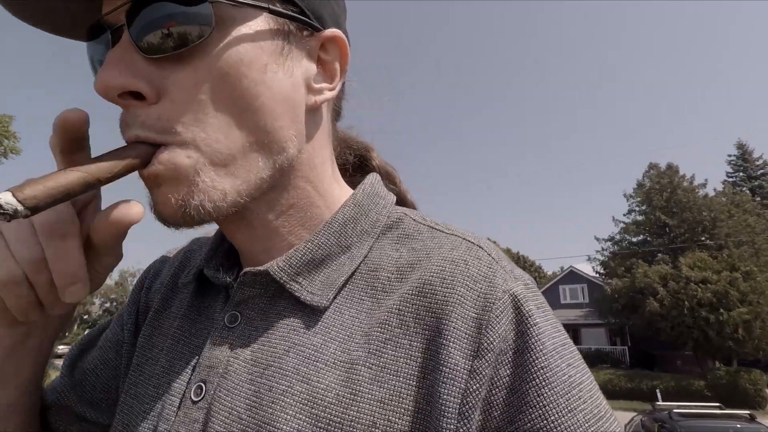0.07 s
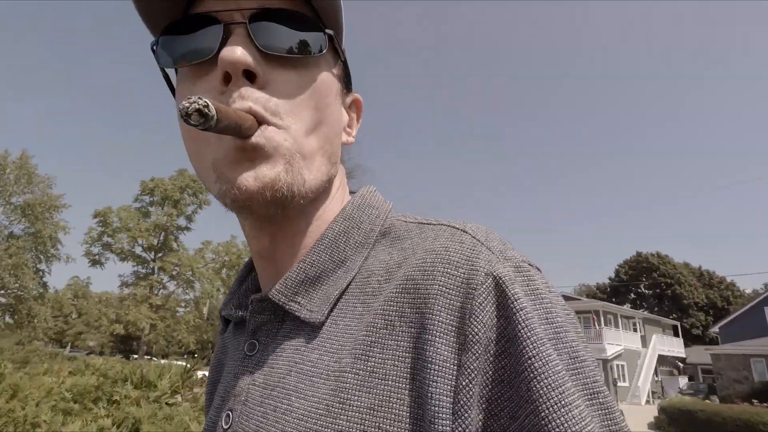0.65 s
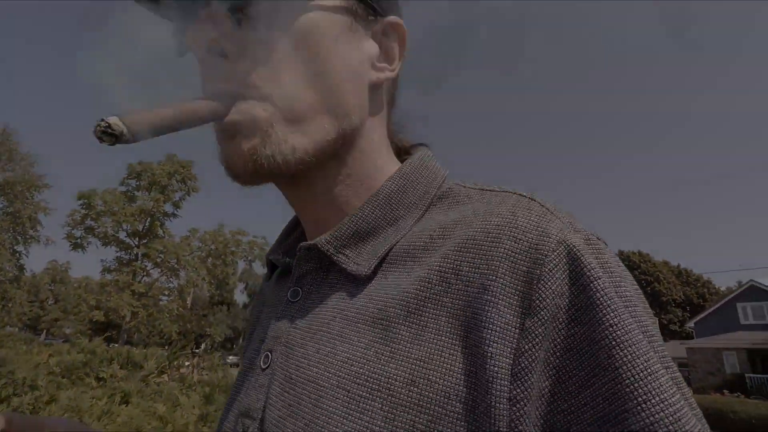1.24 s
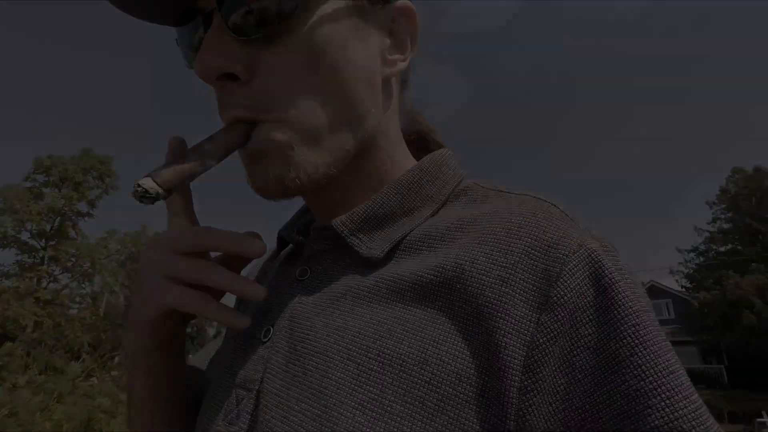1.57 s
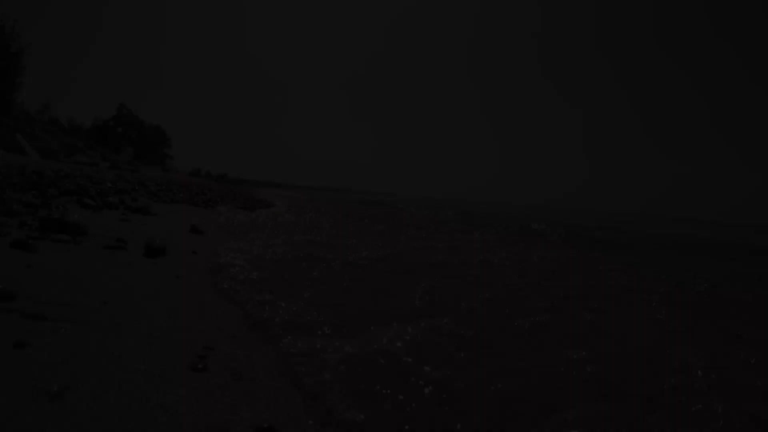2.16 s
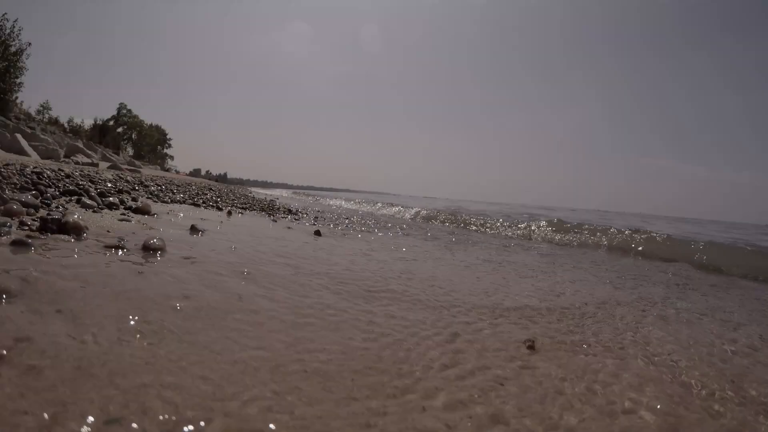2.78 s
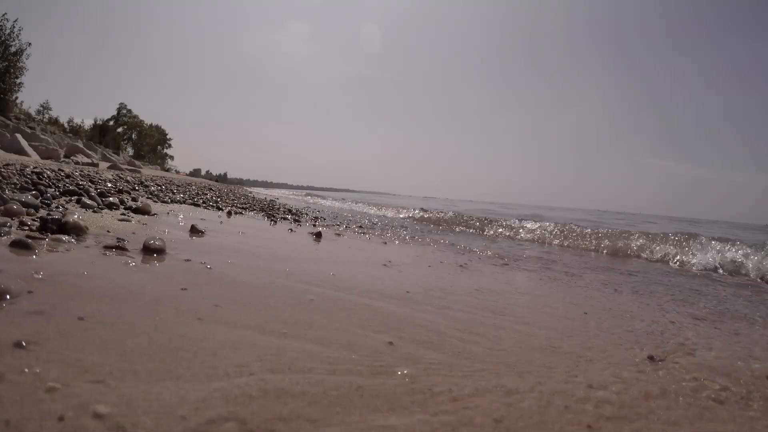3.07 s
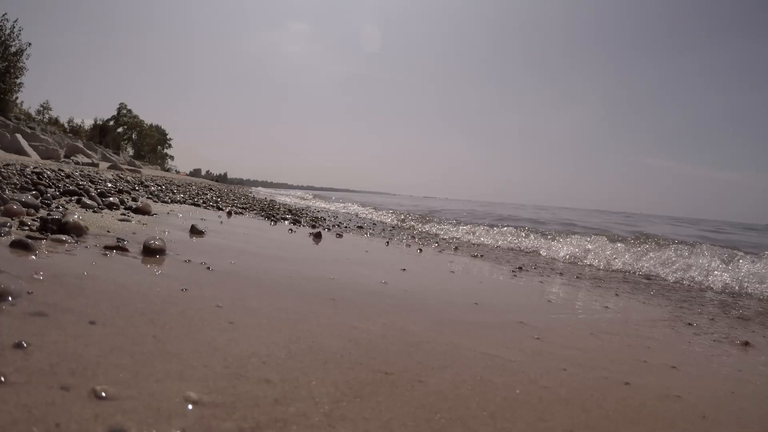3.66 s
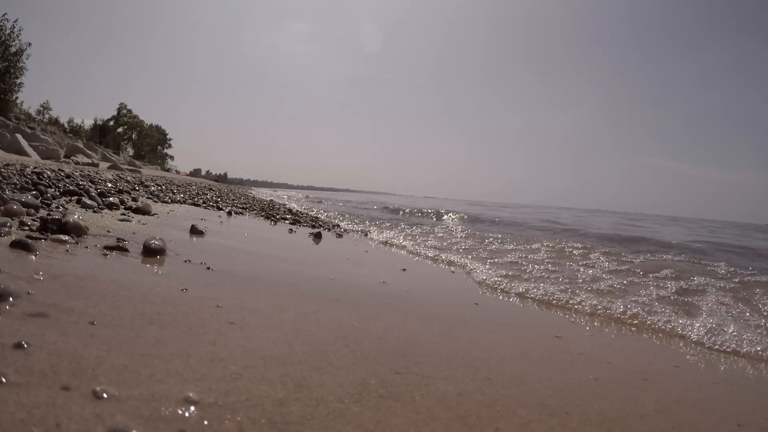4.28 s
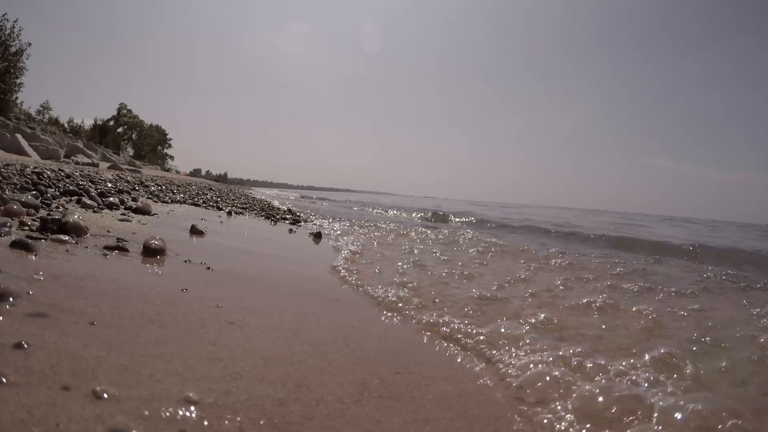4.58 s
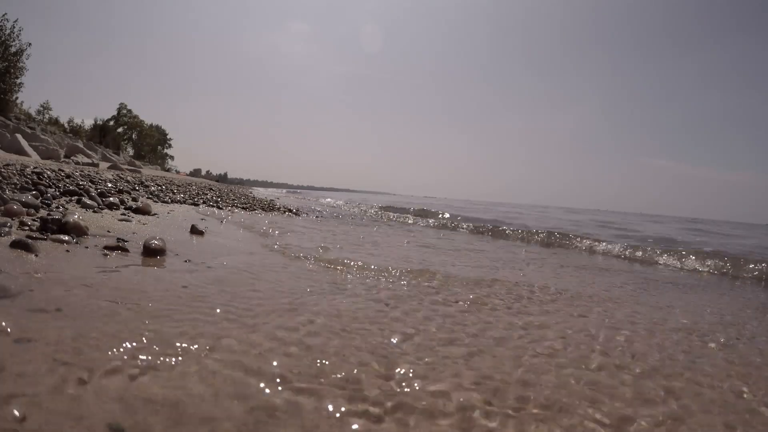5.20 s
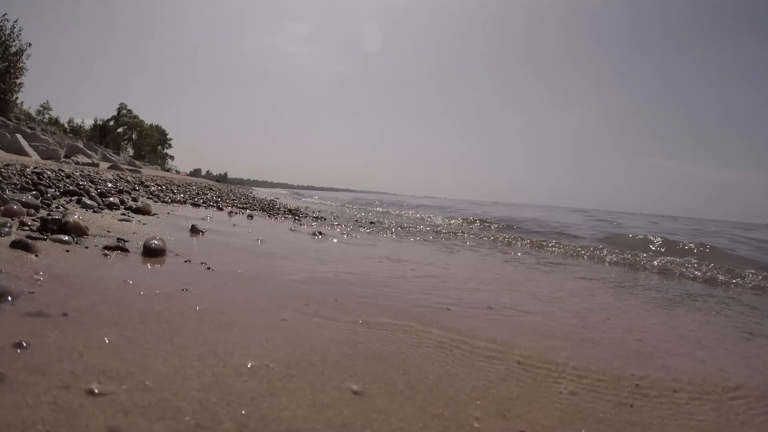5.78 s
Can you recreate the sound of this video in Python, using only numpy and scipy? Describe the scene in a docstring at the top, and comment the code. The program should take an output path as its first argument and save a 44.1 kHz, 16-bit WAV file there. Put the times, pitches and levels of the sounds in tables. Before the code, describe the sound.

Small waves wash onto a sand and pebble shore close by, over a low wavering hum and early wind buffeting the microphone.

```python
"""Small lake waves lap close by, then break and run up a sand and pebble shore.
Each wave is a cloud of ringing bubbles: big ones gurgle, middling ones make a soft wash, tiny ones
fizz as foam and spray. Single bubbles plop, and drops tick and crack on the wet sand.
A low hum wavers underneath, and a breeze buffets the microphone, most of all in the first big wave."""
import sys
import numpy as np
from scipy import signal
from scipy.fft import rfft, irfft, next_fast_len
from scipy.io import wavfile
from scipy.ndimage import uniform_filter1d

SR = 44100
rng = np.random.default_rng(int(sys.argv[2]) if len(sys.argv) > 2 else 0)


def pcm_store(signal):
    """Save signal as 16-bit PCM."""
    levels = np.round(np.clip(np.atleast_2d(signal), -1, 1) * 32767)
    wavfile.write(sys.argv[1], SR, levels.astype(np.int16).T)


N = 257544
TIME = np.arange(N) / SR
FFT_SIZE = next_fast_len(N + 4096)
BIN_HZ = np.maximum(np.arange(FFT_SIZE // 2 + 1) * SR / FFT_SIZE, 1)


def from_db(db):
    """Turn decibels into a number to multiply by."""
    return 10 ** (np.asarray(db) / 20)


def unit_power(x):
    """Scale a sound so that its average power is 1."""
    return x / np.sqrt(np.mean(x ** 2) + 1e-20)


def in_time(rows):
    """Join a table's points into one curve over time for each column."""
    times_s, *columns = np.transpose(rows)
    return [np.interp(TIME, times_s, column) for column in columns]


def in_frequency(rows):
    """Join a table's points into one curve from bass to treble for each column."""
    hz, *columns = np.transpose(rows)
    return [np.interp(np.log(BIN_HZ), np.log(hz), column) for column in columns]


def panned(pan_db):
    """Left and right gains: the left is louder by pan_db."""
    return from_db(np.array([[.5], [-.5]]) * pan_db)


def add(out, start_s, sound):
    """Mix a short sound in at start_s."""
    at = int(start_s * SR)
    out[:, at:at + sound.shape[-1]] += sound[..., :N - at]


def drift(rate_hz):
    """A smooth random wobble, about 1 in size."""
    decay = np.exp(-80 * np.pi * rate_hz / SR)
    noise = rng.standard_normal(N // 40 + 2002)
    slow = signal.lfilter([1], [1, -2 * decay, decay * decay], noise)[2000:]
    return np.interp(np.arange(N) / 40, np.arange(len(slow)), unit_power(slow))


def swells(crest_s, rise_s, fall_s, level_db, floor_db, swing=1):
    """Swells build to a rounded crest, then sink. Gives each one's power and the total in dB."""
    t = TIME - crest_s[:, None]
    # the level moves 10 * swing dB in rise_s or fall_s; minus signs on these make no difference
    shape_db = -10 * np.where(t < 0, (t / rise_s[:, None]) ** 2, t / np.abs(fall_s[:, None]))
    power = from_db(np.maximum(level_db[:, None] + swing * shape_db, -150)) ** 2
    return power, 10 * np.log10(power.sum(axis=0) + from_db(floor_db) ** 2)


def tilted(x, tilt_db, low_hz, high_hz):
    """Raise the treble and lower the bass by a moving amount."""
    spectrum = rfft(x, FFT_SIZE)
    bass = irfft(spectrum / (1 + (BIN_HZ / low_hz) ** 10), FFT_SIZE)[:, :N]
    treble = irfft(spectrum / (1 + (high_hz / BIN_HZ) ** 10), FFT_SIZE)[:, :N]
    return x + (from_db(-tilt_db) - 1) * bass + (from_db(tilt_db) - 1) * treble


def ring(clicks, hz, fade_s):
    """Each click starts a tone. Here and below, fade_s is the time to die away by 60 dB."""
    decay = from_db(-60 / (fade_s * SR))
    step = 2 * np.pi * hz / SR
    return signal.lfilter([0, np.sin(step)], [1, -2 * decay * np.cos(step), decay ** 2], clicks + 1e-18)


def bubble(hz, fade_s, rise, lead_rad):
    """One bubble swells, then dies away as its pitch rises. The left side is ahead by lead_rad."""
    t = TIME[:SR // 10]
    phase = 2 * np.pi * hz * t * (1 + rise * t / fade_s)
    envelope = (1 - np.exp(-2 * hz * t)) * np.exp(-np.log(1000) * t / fade_s)
    return envelope * np.sin(phase + np.array([[lead_rad], [0]]))


def bubble_cloud(low_hz, high_hz, per_s, cycles, size_db, clump_db, blur_db, pitches=24):
    """Two swarms of bubbles, born in clumps and ringing briefly; the far ones blur into noise."""
    out, together = np.zeros((2, N)), drift(28)
    for hz in np.geomspace(low_hz, high_hz, pitches):
        when, size, sign, side, chance = rng.random((5, 6000))
        at = (when * N).astype(int)
        clump = from_db(clump_db * np.minimum((together + drift(20))[at] / np.sqrt(2), 1))
        height = from_db(size_db * np.minimum(-np.log(1 - size), 4.5)) * np.sign(sign - .5) * clump
        born = chance < per_s * N / SR / pitches / len(at)
        clicks = np.zeros((2, N))
        clicks[(2 * side).astype(int), at] = height * born
        out += np.sqrt(hz) * unit_power(ring(clicks, hz, cycles / hz))   # even power per Hz
    return unit_power(out) + from_db(blur_db) * rng.standard_normal((2, N))


# Where the water is: time_s, pan_db, aside (0 straight ahead, 1 off to the side)
WATER_PLACE = [(0.0, -4, 0), (0.37, 5, 0.47), (1.28, -0.5, 0.0071), (1.8, 0.5, 0.29), (2.34, 2.5, 0.974),
               (3.6, 2.5, 0.77), (4.35, 4, 1), (5.11, 2.5, 0.63), (5.27, -2, 0), (5.84, -3, 0.35)]
# How the microphone's two openings compare: pitch_hz, alike (0-1), pan_db, lead_ahead_rad, lead_aside_rad
MIC_OPENINGS = [(130, 0.95, 4.9, -0.2, -0.2), (260, 0.65, 0.0, -0.3, -0.3), (440, 0.85, 0.2, -0.8, -0.2),
                (690, 0.4, -5.0, -1.9, 1.4), (860, 0.78, -1.8, -3.6, 1.9), (1150, 0.92, 1.5, -4.1, 1.9),
                (1270, 0.9, 4.7, -4.2, 1.8), (1500, 0.86, 1.7, -4.6, 1.15), (2400, 0.78, 1.2, -4.35, 1.1),
                (3600, 0.62, 3.0, -5.0, 0.45), (4650, 0.35, -3.6, -6.8, -0.2),
                (5200, 0.66, -0.9, -8.4, -1.3), (7500, 0.7, -1.2, -9.0, -2.4),
                (11000, 0.3, -2.8, -10.5, -4.2)]


def at_microphone(pair, tone_colour):
    """Sound reaches two openings partly alike; how far the left leads depends on where the water is."""
    alike, pan_db, lead_ahead, lead_aside = in_frequency(MIC_OPENINGS)
    _, aside = in_time(WATER_PLACE)
    shared, opposed = rfft(pair, FFT_SIZE) * from_db(in_frequency(tone_colour)[0])
    both_sides = np.sqrt(1 + alike) * shared + np.sqrt(1 - alike) * opposed * [[1], [-1]]
    left, right = both_sides * panned(pan_db)
    spectra = [left * np.exp(1j * lead_ahead), left * np.exp(1j * lead_aside), right]
    left_ahead, left_aside, right = irfft(spectra, FFT_SIZE)[:, :N]
    left = (1 - aside) * left_ahead + aside * left_aside
    return np.array([left, right]) / np.std((left_ahead + right) / 2)


# Tone colours of the wash and of the gurgle: pitch_hz, gain_db
WASH_COLOUR = [(100, -72), (450, -25), (750, -11.5), (1000, -1.5), (1170, -1), (1265, 1.5), (1380, -1.5),
               (1540, -2), (1720, -5), (2100, -10), (2600, -15.5), (3300, -23), (4400, -29.5),
               (6000, -68.5)]
GURGLE_COLOUR = [(90, -50.5), (170, 13.5), (250, -7), (350, -3.5), (520, -1), (720, 0.5), (950, 4),
                 (1400, -51.5)]
# Waves and little slaps of water:
# crest_s, rise_s, fall_s, wash_db, gurgle_db, fizz_db, fizz_treble_db, gurgle_bass_db
LAKE_WAVES = [(.03, 0.5, 0.23, -53, -49.5, -62, -3, -1), (.38, 0.26, 2, -52, -55, -68.5, -4.5, -2),
              (.78, 0.23, 1.5, -40.5, -48, -58, 6, -1), (.97, .38, .48, -33, -39, -45.5, -1.5, 3),
              (1.26, 0.3528, 0.5, -28.5, -35, -42, 1.5, 4.5),
              (1.56, 0.2523, 0.16, -34.5, -43, -49, -1.5, 3), (1.82, -0.27, .12, -42, -39, -58, 2, 0),
              (2.35, 0.25, 0.1944, -41, -44.5, -57.5, 0, -1), (2.69, 0.24, 0.5, -41.5, -45, -59, 1, 1),
              (2.96, 0.37, 0.5, -39, -43.5, -54, -1.5, -0.5),
              (3.22, 0.2286, 0.4, -43.5, -47.5, -65.5, -13.5, 1.5),
              (3.7, 0.12, 2, -47.5, -48.5, -60, -4.5, 1.5), (3.861, 0.1, 0.3, -40, -47.5, -54.5, -4, 2.5),
              (4.258, 0.26, 0.26, -32, -37, -46, -4.5, 0), (4.51, 0.23, 0.12, -39.5, -47, -56.5, -6, -2),
              (4.78, 0.3, 0.13, -40.5, -51.5, -56.5, -1, -1),
              (4.98, 0.18, 0.85, -40.5, -50.5, -57, -1.5, 2.5),
              (5.025, .06, -0.03, -55, -40.5, -65, -0.5, 0.5), (5.36, 0.11, 0.3, -35.5, -50.5, -51, -3, 4),
              (5.57, .16, 0.24, -31.5, -35.5, -59, 10, 3), (5.619, 0.0232, 0.09, -29.5, -31, -46, 1, 0.5),
              (5.79, 0.06, .15, -43, -42.5, -65, 2.5, -3.5)]


def waves():
    """Middling bubbles make the wash, big ones gurgle, tiny ones fizz; all three swell with each wave."""
    crest_s, rise_s, fall_s, wash_tops, gurgle_tops, fizz_tops, treble_db, bass_db = np.transpose(
        LAKE_WAVES)
    _, wash_db = swells(crest_s, rise_s, fall_s, wash_tops, floor_db=-57)
    gurgle_power, gurgle_db = swells(crest_s, rise_s, fall_s, gurgle_tops, floor_db=-60.5)
    foam_crest_s = crest_s - 0.064 * rise_s   # spray flies just before the crest
    foam_power, foam_db = swells(foam_crest_s, rise_s, fall_s, fizz_tops, floor_db=-73, swing=1.137)
    wash = bubble_cloud(585, 5046, per_s=7000, cycles=27.45, size_db=2.5, clump_db=1.5, blur_db=4.5,
                        pitches=40)
    wash = at_microphone(wash, WASH_COLOUR)
    gurgle = bubble_cloud(230.5, 1105, per_s=1200, cycles=23.4, size_db=2.5, clump_db=2, blur_db=-14)
    depth_db = bass_db @ gurgle_power / gurgle_power.sum(axis=0)   # the loudest wave counts most
    gurgle = tilted(at_microphone(gurgle, GURGLE_COLOUR), -depth_db, low_hz=536, high_hz=656)
    water = from_db(wash_db) * wash + from_db(gurgle_db) * gurgle
    fizz = foam_and_spray(foam_power, foam_db, treble_db)
    pan_db, _ = in_time(WATER_PLACE)
    # the body of a wave is wider than its foam, so it leans less to one side
    return water * panned(0.71 * pan_db) + fizz * panned(pan_db)


# Tone colour of the fizz: pitch_hz, gain_db
FIZZ_COLOUR = [(150, -58), (1800, -12.5), (3200, 4), (4700, -4.5), (5800, -1.5), (7800, -1.5),
               (10000, -10.5), (11500, -20.5), (13500, -18), (15000, -34.5)]
# Sheets of spray thrown close by: crest_s, rise_s, fall_s, level_db, treble_db
SPRAY_SHEETS = [(.66, .13, 1.0, -52, 3), (5.298, 0.03, 0.26, -44.5, 3), (5.54, 0.04, 0.09, -44, 2.5)]


def foam_and_spray(foam_power, foam_db, foam_treble_db):
    """Tiny bubbles fizz in the foam, with spray on top; finer foam sounds brighter."""
    *spray_shape, spray_treble_db = np.transpose(SPRAY_SHEETS)
    spray_power, fizz_db = swells(*spray_shape, floor_db=foam_db)
    total_power = foam_power.sum(axis=0) + spray_power.sum(axis=0)
    treble_db = (foam_treble_db @ foam_power + spray_treble_db @ spray_power) / total_power
    fizz = bubble_cloud(2585, 13300, per_s=3500, cycles=32, size_db=2, clump_db=5.5, blur_db=4.5)
    fizz = tilted(at_microphone(fizz, FIZZ_COLOUR), treble_db, low_hz=4530, high_hz=10000)
    # lone ticks stand out in calm water and start to drown once the fizz passes -67 dB
    tick_db = 6.5 - 0.67 * np.maximum(fizz_db + 67, 0)
    return from_db(fizz_db) * (fizz + from_db(tick_db) * foam_ticks())


def foam_ticks(per_s=60, size_db=4, fade_s=0.00337):
    """Lone foam bubbles burst close by at random moments."""
    out = np.zeros((2, N))
    for when, size, pitch, side in rng.random((int(per_s * N / SR), 4)):
        height = from_db(size_db * min(-np.log(1 - size), 2))
        tick = bubble(3000 * 3 ** pitch, fade_s, rise=.04, lead_rad=-0.97)
        add(out, when * N / SR, height * tick * panned(10 * (side - .4)))
    return out


# Swells of the hum: crest_s, rise_s, fall_s, level_db
HUM_LEVELS = [(.72, 0.36, 8, -42), (.95, 0.05, 0.2, -32), (1.14, 0.1, .1, -24), (1.38, 0.31, 0.5646, -27.5),
              (3.336, 0.4, -0.03, -35), (3.63, 0.3, -0.5, -48), (4.1, 0.1, -0.1, -44.5),
              (4.35, 0.34, 3, -49), (5.41, 0.04, 0.1, -29), (5.52, 0.09, 0.24, -31)]
# The hum's note: time_s, pitch_hz, roughness (0-1)
HUM_NOTE = [(0, 140, 0.13), (1.2, 143, 0.82), (1.5, 137.5, 0.82), (1.7, 138, 0.21), (2.3, 143.9, 0.27),
            (3.2, 146.4, 0.12), (3.7, 156, 0.23), (5.15, 153, 0.22), (5.45, 160.1, 0.69),
            (5.84, 158.6, 0.33)]
# The hum throbs more while it is faint: time_s, depth_db
HUM_THROB = [(3.3, .7), (3.6, 2.8), (5.15, 2.8), (5.35, 1)]


def hum(shake_hz=29, above_hz=8, steady_s=0.0472, throb_hz=10):
    """A low tone wavers, now smooth, now a rough drone that spreads a little above its pitch."""
    _, level_db = swells(*np.transpose(HUM_LEVELS), floor_db=-60)
    pitch_hz, rough = in_time(HUM_NOTE)
    noise = rng.standard_normal((2, N))
    shake = unit_power(signal.sosfilt(signal.butter(3, shake_hz, fs=SR, output="sos"), noise))
    shake = (shake[0] + 1j * shake[1]) * np.exp(2j * np.pi * above_hz * TIME)
    drone = np.sqrt(1 - rough) + np.sqrt(rough / 2) * shake
    drone /= np.sqrt(uniform_filter1d(np.abs(drone) ** 2, int(steady_s * SR)))   # even out its strength
    tone = np.real(drone * np.exp(2j * np.pi * np.cumsum(pitch_hz) / SR))
    tone = signal.sosfilt(signal.butter(6, 109, "high", fs=SR, output="sos"), tone)
    throb = from_db(in_time(HUM_THROB)[0] * drift(throb_hz))
    pan_db = np.interp(TIME, [1.5, 5.0], [5.2, 1.8])
    return from_db(level_db) * unit_power(tone * throb) * panned(pan_db)


# Strength of the breeze's rumble: time_s, level_db
BREEZE_LEVEL = [(0.0, -54.5), (0.18, -59.5), (0.85, -36), (0.95, -40.5), (1.1, -25), (1.21, -37),
                (1.4, -31.5), (2.29, -41), (3.3, -65), (3.33, -54), (4.77, -69), (5.84, -75)]
# Tone colour of the rumble: pitch_hz, gain_db
RUMBLE_COLOUR = [(12, -27), (25, -9), (40, 5.5), (55, 4.5), (75, 9.5), (110, 10.5), (170, 3.5), (235, -3.5),
                 (330, -52)]
# Sudden gusts: start_s, level_db, pitch_hz, fade_s
GUSTS = [(.818, -10.5, 134, 0.25), (1.003, -10.5, 117.5, 0.21), (1.075, -18.5, 90, .14),
         (1.11, -19, 124.3, .1), (1.168, -13.5, 153, 0.12), (1.585, -31, 120, 0.105),
         (2.615, -26.5, 142.5, 0.52)]


def breeze(swell_s=0.011):
    """Air rumbles over the microphone, and each gust hits it with a soft thud."""
    rumble = at_microphone(rng.standard_normal((2, N)), RUMBLE_COLOUR)
    out = from_db(in_time(BREEZE_LEVEL)[0]) * rumble
    t = TIME[:SR // 2]
    for start_s, level_db, pitch_hz, fade_s in GUSTS:
        envelope = (1 - np.exp(-(t / swell_s) ** 2)) * np.exp(-np.log(1000) * t / fade_s)
        thud = envelope * np.sin(2 * np.pi * pitch_hz * t)
        add(out, start_s, from_db(level_db) * thud * panned(5.54))
    return out


# Big single bubbles: start_s, level_db, pitch_hz, fade_s
BIG_BUBBLES = [(.065, -37, 804, 0.027), (.18, -38.5, 780, .05), (.479, -21, 1104, 0.0144),
               (.683, -25, 1388, 0.022), (.705, -19.5, 1420, 0.015), (.763, -15.5, 1250, 0.0147),
               (.955, -15, 1420, .025), (.989, -16.5, 1279, 0.033), (1.228, -17, 1343, 0.033),
               (1.333, -15, 1380, .025), (2.311, -27, 785, .04), (2.413, -25.5, 1410, 0.0304),
               (2.533, -28.5, 1300, .03), (2.689, -22, 1285, 0.038), (2.764, -28.5, 442, 0.055),
               (2.767, -23.5, 1216, 0.024), (2.909, -24, 1600, 0.034), (2.973, -13.5, 1238, 0.016),
               (2.974, -18, 1720, 0.017), (3.164, -26.5, 1445, 0.053), (3.232, -29, 329, 0.087),
               (3.289, -28, 1410, 0.022), (3.854, -26, 600, 0.033), (3.896, -22, 1320, 0.049),
               (4.109, -17, 1410, 0.016), (4.157, -23.5, 490, 0.049), (4.505, -18.5, 1220, 0.018),
               (4.597, -23.5, 760, 0.021), (4.955, -31, 1290, 0.1), (4.969, -29, 1460, 0.0166),
               (5.021, -28, 674, 0.027), (5.027, -26.5, 780, 0.028), (5.09, -27, 1561, .03),
               (5.315, -26, 214.5, 0.19), (5.337, -20.5, 1296, 0.036), (5.348, -18, 1510, .03),
               (5.349, -27.5, 920, .03), (5.62, -13, 1080, 0.029), (5.658, -19.5, 1340, 0.034),
               (5.75, -19.5, 745, 0.041)]
# Drops and bursting foam close by: start_s, level_db, pitch_hz, fade_s, pan_db
CLOSE_DROPS = [(.524, -35.5, 3180, 0.016, 0), (.72, -30, 3860, 0.007, 4), (2.177, -40, 7950, 0.0048, -8),
               (2.467, -44, 9150, 0.005, -14), (2.511, -31.5, 6760, 0.0022, 13.5),
               (2.517, -34.5, 3346, .014, 7), (2.591, -37, 7190, 0.0053, 12), (2.685, -35, 3800, .012, 7),
               (2.806, -31, 3110, .016, 0), (3.242, -37, 3230, .014, 11), (3.302, -33, 5200, .0017, 13),
               (3.403, -35, 6900, 0.0033, 6.5), (3.451, -33.5, 4480, 0.012, 6),
               (3.493, -35, 8380, 0.0023, 5), (3.844, -35.5, 7440, 0.007, 4.5),
               (3.981, -30, 5850, 0.0058, 5.5), (5.051, -41, 6200, .006, 5), (5.214, -41, 4450, .012, -7),
               (5.259, -39, 4240, 0.0126, -2), (5.536, -29, 8250, .0038, -6.5)]


def plops_and_drops():
    """Single bubbles ring out: big ones plop in the waves, small ones tick on the wet sand."""
    out = np.zeros((2, N))
    for start_s, level_db, pitch_hz, fade_s in BIG_BUBBLES:
        plop = bubble(pitch_hz, fade_s, rise=0.021, lead_rad=1.455)
        add(out, start_s, from_db(level_db) * plop * panned(1.7))
    for start_s, level_db, pitch_hz, fade_s, pan_db in CLOSE_DROPS:
        tick = bubble(pitch_hz, fade_s, rise=0.088, lead_rad=-0.67)
        add(out, start_s, from_db(level_db) * tick * panned(pan_db))
    return signal.sosfilt(signal.butter(2, 130, "high", fs=SR, output="sos"), out)


# Flurries of droplets: start_s, length_s, top_level_db, drops_per_s
FLURRIES = [(2.504, 0.38, -35.5, 30), (3.653, 0.27, -41, 30), (4.93, .19, -40.5, 130),
            (5.331, .32, -30, 50)]


def spatter(low_hz=3780, high_hz=9300, fade_s=0.0042, spread_db=18, tries=60):
    """Tiny droplets spatter on the wet sand at random times, sizes and pitches."""
    out = np.zeros((2, N))
    for start_s, length_s, top_level_db, drops_per_s in FLURRIES:
        for when, size, pitch, side, chance in rng.random((tries, 5)):
            if chance < drops_per_s * length_s / tries:
                pitch_hz = low_hz * (high_hz / low_hz) ** pitch
                drop = bubble(pitch_hz, fade_s, rise=.04, lead_rad=-0.5) * panned(10 * (side - .3))
                add(out, start_s + when * length_s, from_db(top_level_db - spread_db * size) * drop)
    return out


# Droplets that land with a crack: start_s, level_db, pan_db
SAND_HITS = [(2.737, -42, 0), (3.65, -47, -1.5), (3.803, -48.5, 5), (3.921, -43, 8), (4.952, -44, -2.5),
             (4.963, -44.5, 0), (4.968, -36, 6), (4.991, -44, 6), (5.005, -41, -3), (5.012, -45, 3),
             (5.023, -47, 4), (5.073, -39, -3), (5.079, -43, 5), (5.098, -42, 1)]


def splats(low_hz=3800, high_hz=8700, fade_s=0.0064):
    """Droplets hit the wet sand without trapping a bubble: each is a dry, crisp crack."""
    out, t = np.zeros((2, N)), TIME[:SR // 100]
    band = signal.butter(2, [low_hz, high_hz], "band", fs=SR, output="sos")
    for start_s, level_db, pan_db in SAND_HITS:
        burst = rng.standard_normal(len(t)) * np.exp(-np.log(1000) * t / fade_s)
        crack = signal.sosfilt(band, burst)
        add(out, start_s, from_db(level_db) * crack / np.abs(crack).max() * panned(pan_db))
    return out


def scene():
    """The water, the hum and the breeze, all together."""
    return waves() + plops_and_drops() + spatter() + hum() + breeze() + splats()


def record(dry, soften_hz=11500, cutoff_hz=15000):
    """The highest treble fades, then is cut off steeply."""
    soft = signal.sosfilt(signal.butter(4, soften_hz, fs=SR, output="sos"), dry)
    return signal.sosfilt(signal.ellip(10, .1, 80, cutoff_hz, fs=SR, output="sos"), soft)


dry = scene()
out = record(dry)
pcm_store(out)
```